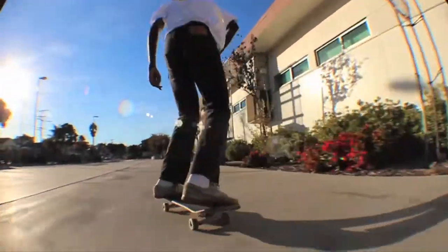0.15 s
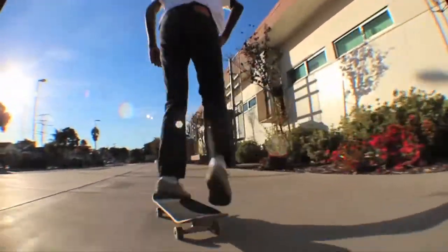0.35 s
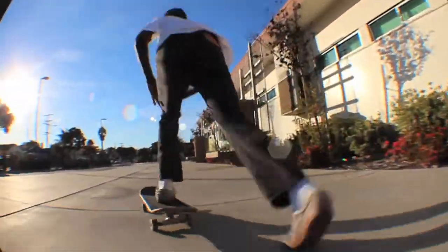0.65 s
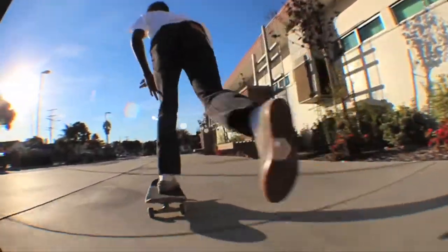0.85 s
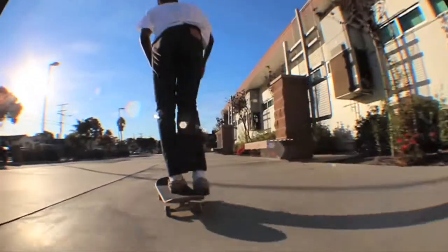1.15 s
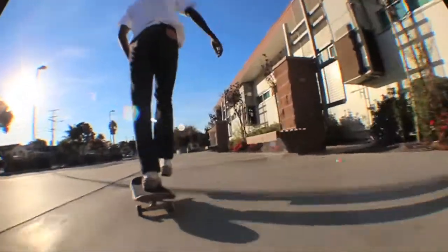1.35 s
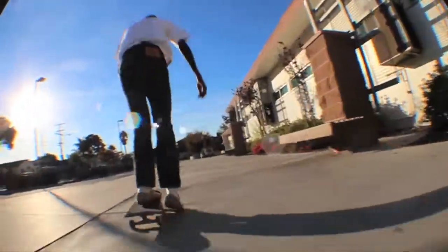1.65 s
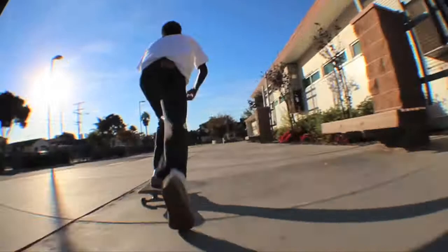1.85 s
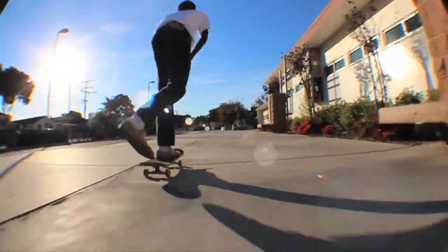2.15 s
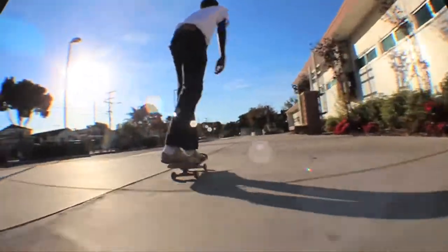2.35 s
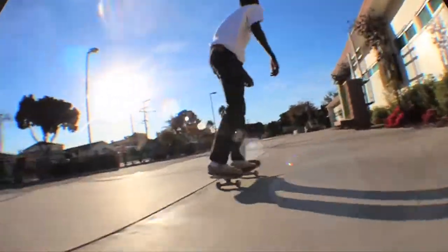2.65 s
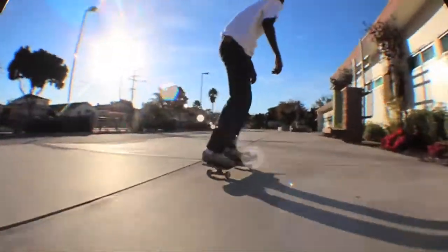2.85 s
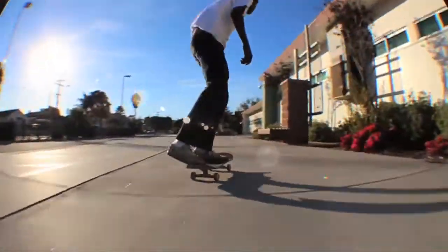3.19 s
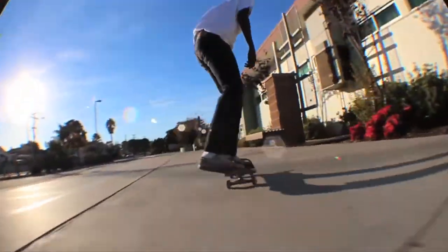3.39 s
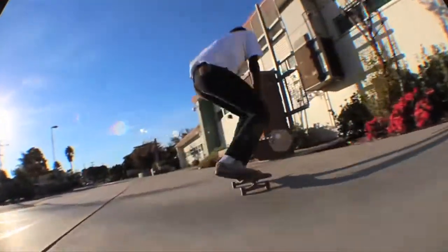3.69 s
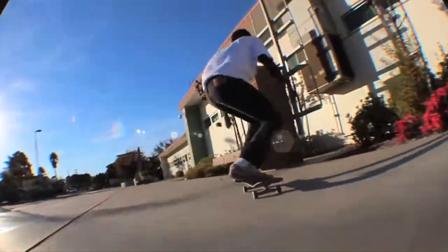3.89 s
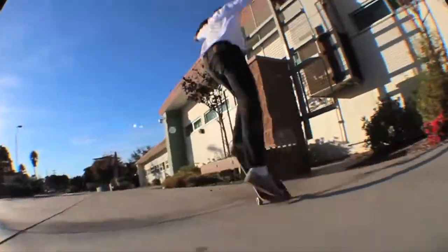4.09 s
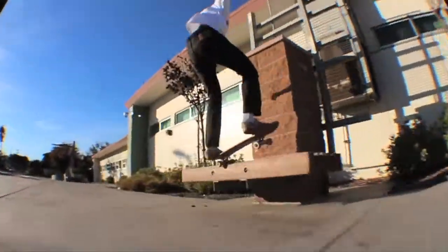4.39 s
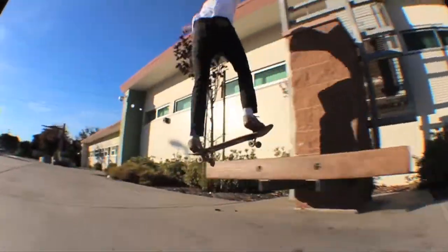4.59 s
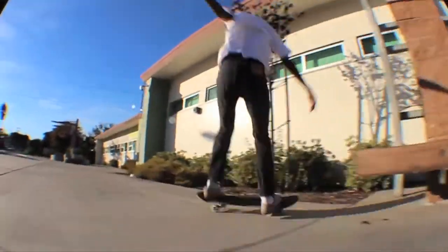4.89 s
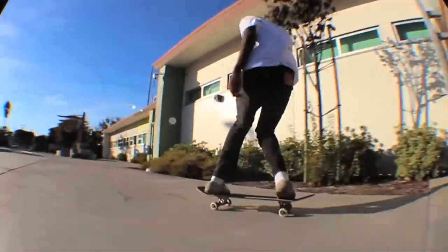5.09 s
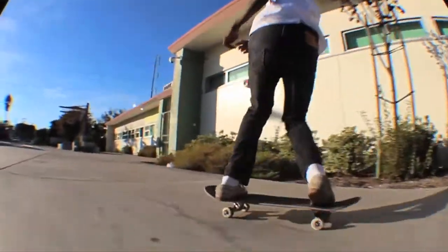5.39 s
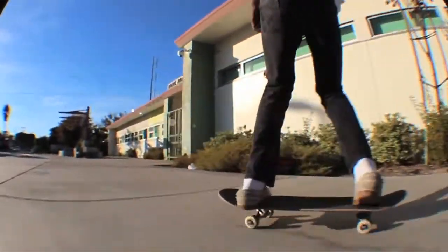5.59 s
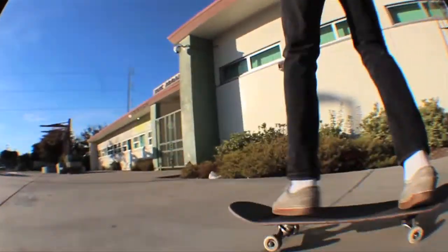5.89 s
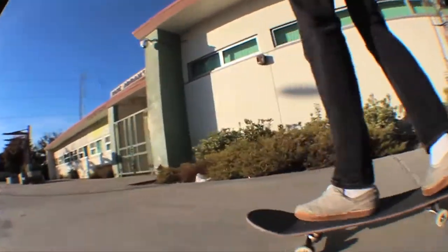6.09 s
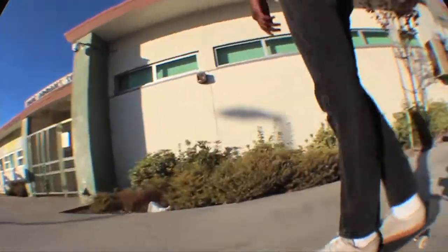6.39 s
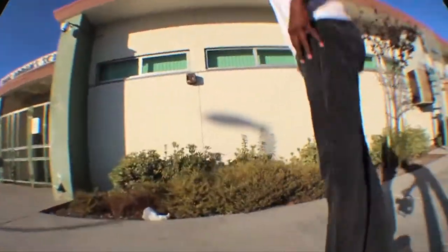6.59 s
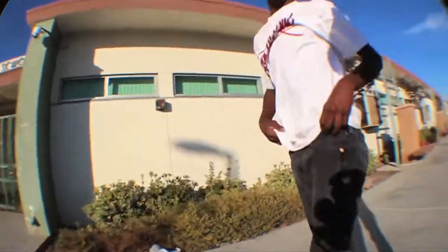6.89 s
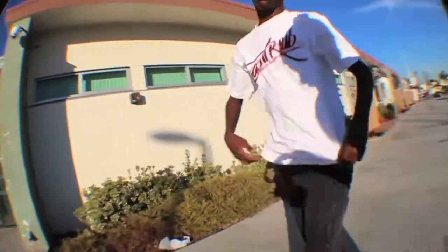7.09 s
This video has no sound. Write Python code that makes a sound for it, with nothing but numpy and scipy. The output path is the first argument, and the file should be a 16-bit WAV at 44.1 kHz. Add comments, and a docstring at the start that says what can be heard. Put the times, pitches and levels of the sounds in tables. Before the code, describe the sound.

Gritty hollow wheel rumble with sharp wooden clacks, a quick pop and bench knock, a short scrape, loud landing cracks, and low wind on the microphone.

```python
"""Concrete slabs in the open, with a bench: a skateboard rolls, is popped onto the bench, slides, lands and
rolls on, while the microphone follows on a second board. Random grit impacts excite the resonant deck through
soft wheels and hiss beneath them; blows with decaying chatter ring deck and truck. Scrapes, ticks and wind are
shaped noise. The recorder turns its gain down after loud blows, clips the peaks and lets the gain creep back."""
import sys
import numpy as np
from scipy import signal
from scipy.fft import rfft, irfft
from scipy.io import wavfile

SR = 44100
rng = np.random.default_rng(int(sys.argv[2]) if len(sys.argv) > 2 else 0)


def generate_wav(sig):
    """Save sig (samples, or channels by samples) to the path in sys.argv[1] as 16-bit PCM at SR."""
    pcm = np.round(np.clip(np.atleast_2d(sig).T, -1, 1) * 32767).astype(np.int16)
    wavfile.write(sys.argv[1], SR, pcm)


N = 319725

# bending modes of the plywood deck: [f/Hz, width/Hz, relative level/dB]
DECK_MODES = [(217, 248, -11), (326, 68, -1.5), (498.3, 82, 0.5), (617, 69.6, 1), (787, 156, -4),
              (1121, 117, -4), (1241, 128, -4.5), (1950, 1540, -20)]
# bright spectrum shared by bearing hiss and ticks: [f/Hz, relative level per Hz/dB]
BEARING_SPECTRUM = [(3000, -22), (6000, 4), (8000, -1.5), (10500, 2), (13000, -3), (16000, 1)]


def from_db(db):
    """Logarithmic level: 20 dB is a factor of ten in amplitude."""
    return 10 ** (np.asarray(db) / 20)


def rms_one(x):
    """Normalisation by mean power: the rms becomes 1."""
    return x / np.sqrt(np.mean(x ** 2) + 1e-20)


def peak_one(x):
    """Normalisation by amplitude: the peak becomes 1."""
    return x / np.abs(x).max()


def along(rows, axis=1):
    """Linear interpolation in time: one column of a curve at every sample."""
    return np.interp(np.arange(N) / SR, np.array(rows)[:, 0], np.array(rows)[:, axis])


def lag(x, seconds):
    """First-order relaxation: one-pole smoothing with a time constant."""
    pole = np.exp(-1 / (seconds * SR))
    return signal.lfilter([1 - pole], [1, -pole], x)


def drift(rate_hz):
    """Low-pass random fluctuation: noise smoothed twice, with rms 1."""
    tau = 1 / (2 * np.pi * rate_hz)
    noise = rng.standard_normal(N + SR)
    settled = lag(lag(noise, tau), tau)[SR:]
    return rms_one(settled)


def colour(x, spectrum):
    """Minimum-phase filtering: a folded cepstrum gives a smooth spectrum without pre-echo."""
    size = 8192
    hz, db = np.transpose(spectrum)
    bins_hz = np.arange(size // 2 + 1) * SR / size
    log_gain = np.log(from_db(np.interp(np.log(bins_hz + 1), np.log(hz), db)))   # + 1 avoids log 0
    cepstrum = irfft(log_gain)[:size // 2] * 2
    cepstrum[0] /= 2
    impulse_response = irfft(np.exp(rfft(cepstrum, size)))
    return signal.fftconvolve(x, impulse_response)[:len(x)]


def resonate(x, hz, width_hz):
    """Damped oscillator: a two-pole resonance with about unit gain at its top."""
    r = np.exp(-np.pi * width_hz / SR)
    numerator = [(1 - r * r) / 2, 0, (r * r - 1) / 2]
    denominator = [1, -2 * r * np.cos(2 * np.pi * hz / SR), r * r]
    return signal.lfilter(numerator, denominator, x)


def deck(x, spread_db=0):
    """Modal superposition: the plywood's broad modes in parallel, with alternating sign."""
    gains = from_db(np.array(DECK_MODES)[:, 2] + spread_db)
    return sum((-1) ** k * gains[k] * resonate(x, hz, width)
               for k, (hz, width, _) in enumerate(DECK_MODES))


def grains(size_db):
    """Shot noise: wheels meet grit in random clicks, most small and a few large."""
    grains_per_s = 3000
    born = rng.random(N) < grains_per_s / SR
    sizes = from_db(size_db * np.minimum(rng.exponential(1, N), 5))
    return rms_one(born * sizes * rng.choice([-1, 1], N))


def rolling():
    """Common excitation: the same grit shakes the deck through soft wheels and hisses under them."""
    # deck rumble: [t/s, level/dB]
    rumble_curve = [(0, -17), (.2, -17), (.51, -10.5), (1.0, -16), (1.3, -12.5), (1.55, -18.5),
                    (2.19, -15.5), (2.4, -18.5), (2.65, -15.5), (3.03, -23.5), (3.25, -20), (4.05, -13),
                    (4.38, -21.5), (4.72, -16), (5.06, -25.5), (5.23, -19.5), (5.4, -26), (5.75, -20),
                    (6.24, -14), (6.45, -15.5), (6.74, -10), (7.25, -13.5)]
    # roughness of the slabs: [t/s, grit hiss re rumble/dB]
    roughness_curve = [(0, -18.5), (.6, -16), (1.5, -13), (2.0, -13), (2.5, -15), (3.5, -11), (3.88, -18.5),
                       (4.22, -11.5), (4.6, -8.5), (5.9, -12.5), (6.1, -16.5), (6.2, -15.5), (7.0, -22.5),
                       (7.25, -19.5)]
    # bearing hiss: [t/s, level/dB, extra weight of its top band/dB]
    bearing_curve = [(0, -44.5, -3), (.2, -44, 1), (.4, -32, -2.5), (.9, -34, -5), (1.35, -42, -10),
                     (1.55, -37, 1.5), (1.85, -37, -1.5), (2.05, -46.5, 3), (2.7, -51, 1), (3.2, -36, -4),
                     (3.4, -39.5, -6), (3.75, -48, -1), (4.05, -46, 2), (4.3, -50, 2), (4.35, -43, 4),
                     (4.56, -38, 1), (4.7, -41, 2), (4.9, -49, 2.5), (5.6, -47, 2.5), (6.1, -48, 5),
                     (6.2, -50, 6), (6.75, -44, -1.5), (7.25, -43, -7)]
    # grit hiss: [f/Hz, relative level per Hz/dB]
    grit_spectrum = [(1200, -6), (1700, 13.5), (2300, 11), (3000, 6.5), (3800, 4), (4600, 0.5),
                     (6000, -7.5), (7500, -9.5), (10000, -31)]
    wheel_soft_hz, top_band_hz = 1650, 9600
    patches_db, flicker_db = 1.45 * drift(27.0), 2.0 * drift(66)   # rough patches move all three parts

    grit = grains(size_db=3.0) + 1.07 * rng.standard_normal(N)
    wheel_lowpass = signal.butter(2, wheel_soft_hz, fs=SR, output="sos")
    through_wheels = signal.sosfilt(wheel_lowpass, grit)
    rumble_db = along(rumble_curve)
    rumble = from_db(rumble_db + patches_db) * rms_one(deck(through_wheels))

    hiss_db = rumble_db + along(roughness_curve) + 0.43 * patches_db + flicker_db
    hiss = from_db(hiss_db) * rms_one(colour(grit, grit_spectrum))

    spin = colour(grains(size_db=4.5) + 1.2 * rng.standard_normal(N), BEARING_SPECTRUM)
    top_highpass = signal.butter(2, top_band_hz, "high", fs=SR, output="sos")
    top = signal.sosfiltfilt(top_highpass, spin)
    spin = spin + (from_db(along(bearing_curve, axis=2)) - 1) * top
    spin_db = along(bearing_curve) + 0.29 * patches_db + 0.91 * flicker_db
    return rumble + hiss + from_db(spin_db) * rms_one(spin)


def clacks():
    """Impact excitation: strike and chatter ring the deck and struck spot, chatter the truck and crack."""
    # wheels on joints, pop, bench and landing: [t/s, blow level/dB, crack re blow/dB,
    # struck spot f/Hz, chatter t60/s, truck knock re blow/dB]
    blows = [(0.087, 9, -26, 794, 0.026, -5), (0.125, -11, -22, 504, 0.083, -12),
             (.213, 12, -30, 700, 0.022, -4), (.7015, 0.5, -1, 700, 0.02, -11),
             (.707, -0.5, -8, 900, 0.11, -10.5), (0.809, -9, 0, 463, 0.045, -4),
             (1.243, 9, -6.5, 870, 0.058, -8), (1.350, 9.5, -24, 1030, 0.046, -1),
             (2.221, 7.5, -28, 780, 0.027, -13.5), (2.251, 4, -26, 800, 0.054, -9),
             (2.327, 9, -16, 527, 0.045, -10), (2.727, 10.5, -16, 548, 0.086, -9),
             (2.818, 13, -15.5, 770, 0.056, -11), (2.852, 1.5, -19, 570, 0.037, -9),
             (3.006, -5, -16, 390, 0.04, -14), (3.131, -9, -5.5, 410, 0.08, -9),
             (3.541, 9, -12.5, 925, 0.078, -8), (3.652, 11, -18, 840, 0.019, -5.5),
             (4.02, -12, -8, 570, 0.027, -13), (4.141, 1, -0.5, 1200, 0.036, 1.5),
             (4.344, -1.5, -4.5, 2500, 0.027, 2), (4.365, -10.5, -5, 615, 0.072, 3),
             (4.395, -15, -12, 577, 0.023, 0), (4.567, 11, -5.5, 1070, 0.08, -8.5),
             (4.649, -5.5, 8, 840, 0.018, 0), (4.659, 10.5, -6, 830, 0.044, -6.5),
             (4.684, 13.5, -19, 590, 0.074, -12.5), (4.884, 6.5, -4, 603, 0.047, -1),
             (4.906, 3.5, -17, 820, 0.093, -19), (4.919, -3, 1, 690, 0.066, -8),
             (5.135, 12, -7, 834, 0.053, -11), (5.258, 10.5, -12.5, 780, 0.034, -4.5),
             (5.929, 5.5, -5.5, 568, 0.032, -8), (6.0772, 15.5, -13, 480, 0.096, -10),
             (6.119, 0.5, -13, 520, 0.07, -32), (6.212, 19.5, -15, 470, 0.026, -6.5),
             (6.252, -10, -4, 360, 0.043, -1.5), (6.728, 2, -23, 480, 0.15, -14)]
    # crack: [f/Hz, relative level per Hz/dB]
    crack_spectrum = [(2000, -8.5), (3500, 8.5), (5000, 0), (7000, -3), (11000, -11), (15000, -19.5)]
    thump_hz, thump_db, contact_soft_hz = 179, -24, 2500
    truck_hz, truck_width_hz = 2035, 1445   # width of each of two passes
    out, span = np.zeros(N + SR), SR // 8
    t = np.arange(span) / SR
    noise = rng.standard_normal((len(blows), span))
    mode_spreads_db = rng.normal(0, 2, (len(blows), len(DECK_MODES)))   # each blow favours other modes
    contact_lowpass = signal.butter(2, contact_soft_hz, fs=SR, output="sos")
    thump = from_db(thump_db) * np.sin(2 * np.pi * thump_hz * t) * np.exp(-t / 0.00079)
    strike = 3 * np.exp(-t / 0.00025)
    for row, chatter, spread_db in zip(blows, noise, mode_spreads_db):
        s, blow_db, crack_db, spot_hz, t60, truck_db = row
        rattle = chatter * from_db(-60 * t / max(t60, 0.005))
        contact = rattle + strike
        spot = 1.55 * resonate(contact, spot_hz, 176)
        body = signal.sosfilt(contact_lowpass, deck(contact, spread_db) + spot)
        truck = resonate(resonate(rattle, truck_hz, truck_width_hz), truck_hz, truck_width_hz)
        crack = colour(rattle * np.exp(-t / 0.0043), crack_spectrum)
        blow = peak_one(body) + thump
        blow += from_db(truck_db) * peak_one(truck)
        blow += from_db(crack_db) * peak_one(crack)
        out[round(s * SR):][:span] += from_db(blow_db) * blow
    return out[:N]


def scuffs():
    """Friction noise: grainy scrapes with quick edges and a fluctuating level."""
    # shoes and deck scraping on grip tape and bench: [t/s, length/s, level/dB]
    strokes = [(0.56, 0.08, -27), (1.046, 0.21, -53), (4.145, 0.029, -28), (4.36, 0.062, -29),
               (4.472, 0.057, -34), (4.532, 0.02, -23.5), (4.558, 0.051, -27), (4.887, 0.03, -11),
               (4.931, .02, -11), (4.952, 0.04, -29), (5.847, 0.097, -33), (6.075, 0.065, -29)]
    # scrape: [f/Hz, relative level per Hz/dB]
    scrape_spectrum = [(800, -2), (2000, 8), (4000, -12), (7000, -10), (11000, -14), (15000, -16)]
    t = np.arange(N) / SR
    gates = sum(from_db(db) * ((t > s) & (t < s + length)) for s, length, db in strokes)
    flicker = from_db(3 * drift(90))
    return lag(gates, 0.0011) * flicker * rms_one(colour(grains(size_db=2.0), scrape_spectrum))


def ticks():
    """Exponential decay: short bright noise bursts, perhaps pebbles flicked from under the wheels."""
    # thin high ticks: [t/s, level/dB]
    tick_rows = [(.65, -23), (1.57, -26), (1.71, -28), (1.75, -26), (1.795, -27), (1.82, -26),
                 (2.21, -25.5), (4.316, -26), (4.325, -28), (4.372, -17), (4.398, -28), (4.449, -26),
                 (4.457, -26), (4.515, -26), (4.538, -29), (4.722, -24), (4.78, -33), (4.845, -32)]
    decay_s = 0.0044
    t = np.arange(N) / SR
    bursts = sum(from_db(db) * (t > s) * np.exp(-np.maximum(t - s, 0) / decay_s) for s, db in tick_rows)
    return bursts * rms_one(colour(rng.standard_normal(N), BEARING_SPECTRUM))


def follower():
    """Cascaded resonance: grit rings the second board, under the microphone carrier, in a few modes."""
    # level of this board: [t/s, level/dB]
    follower_curve = [(0, -30.5), (.8, -48), (1.5, -31), (2.2, -39), (3.0, -29), (3.4, -23.5), (3.8, -22.5),
                      (4.4, -26.5), (4.9, -25.5), (5.5, -22.5), (6.1, -21), (6.2, -22), (6.6, -32),
                      (7.25, -44)]
    # its deck and truck modes: [f/Hz, width before widening/Hz, relative level/dB]
    follower_modes = [(490, 109, 2), (1368, 188, -4), (3620, 600, -21), (5380, 670, -33)]
    widening = 1.94   # applied to both passes of every mode
    grit = grains(size_db=5.5) + 0.41 * rng.standard_normal(N)
    rings = sum(from_db(db) * resonate(resonate(grit, hz, widening * width), hz, widening * width)
                for hz, width, db in follower_modes)
    sway_db = 3 * drift(8)
    return from_db(along(follower_curve) + sway_db) * rms_one(rings)


def gusts():
    """Exponential growth and decay: each gust is straight in dB and the strongest rules."""
    # gusts: [t of peak/s, level/dB, fall on either side/(dB per s)]
    gust_rows = [(.17, -23, 80), (.51, -16, 94), (.92, -19, 47), (2.02, -15.5, 41), (2.56, -7, 57),
                 (3.2, -15.5, 19), (3.71, -16, 35), (4.05, -14, 55), (5.23, -26, 120), (6.24, -21, 80),
                 (7.25, -10.5, 46)]
    breeze_db = -38
    t = np.arange(N) / SR
    return np.max([np.maximum(db - fall * np.abs(t - s), breeze_db) for s, db, fall in gust_rows], axis=0)


def wind():
    """Turbulent pressure: low-frequency noise with a lumpy level buffets the microphone."""
    # buffeting: [f/Hz, relative level per Hz/dB]
    wind_spectrum = [(10, -16), (25, -16.5), (60, -8.5), (120, -2.5), (220, -2), (400, -4.5), (800, -10.5),
                     (2000, -58)]
    lumps_db = 3.5 * drift(8)
    return from_db(gusts() + lumps_db) * rms_one(colour(rng.standard_normal(N), wind_spectrum))


def scene():
    """Linear superposition: boards, blows and wind add at one microphone."""
    return (rolling() + clacks() + scuffs() + ticks() + follower() + wind())[None]


def record(dry):
    """Delayed compression and clipping: the gain reacts too late for the first ms of a blow."""
    threshold_db, squeeze = -12.5, 0.94   # squeeze: dB of reduction per dB over the threshold
    attack_s, release_db_per_s = 0.028, 26
    stop_edge_hz = 16100   # 45 dB down from here up
    level_db = 10 * np.log10(lag(dry[0] ** 2, 0.0045) + 1e-12)
    over_db = np.maximum(level_db - threshold_db, 0)
    ramp = release_db_per_s * np.arange(N) / SR
    held_db = np.maximum.accumulate(over_db + ramp) - ramp   # falls no faster than the release rate
    ridden = dry * from_db(-squeeze * lag(held_db, attack_s))
    steep_lowpass = signal.cheby2(12, 45, stop_edge_hz, fs=SR, output="sos")
    return signal.sosfilt(steep_lowpass, np.clip(ridden, -1, 1))


dry = scene()
out = record(dry)
generate_wav(out)
```